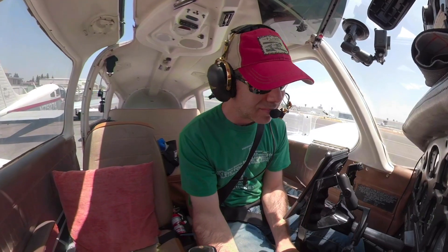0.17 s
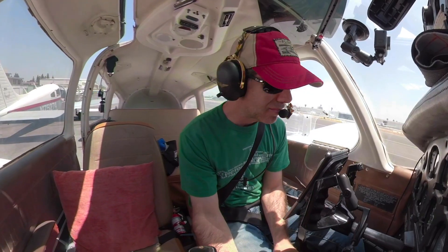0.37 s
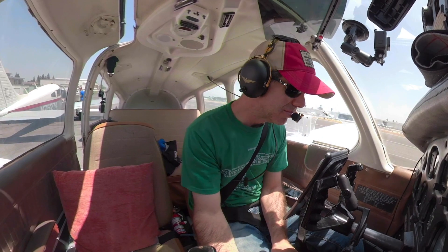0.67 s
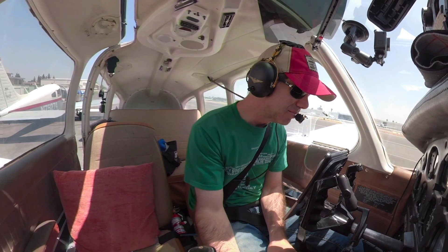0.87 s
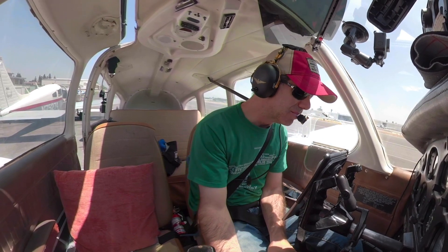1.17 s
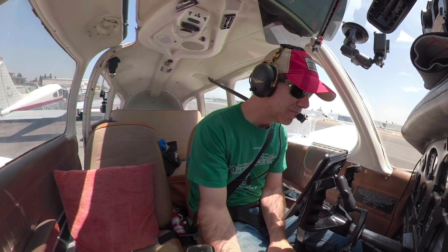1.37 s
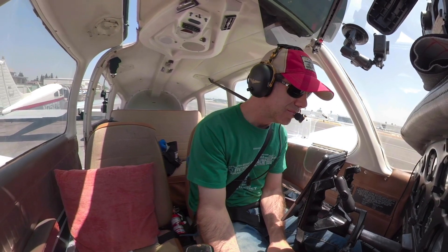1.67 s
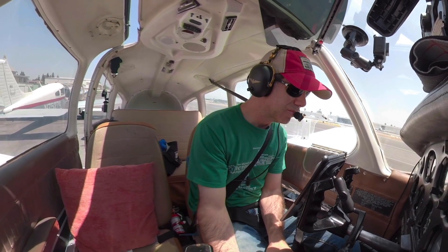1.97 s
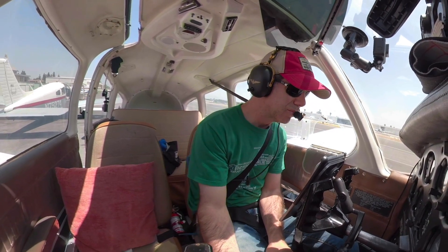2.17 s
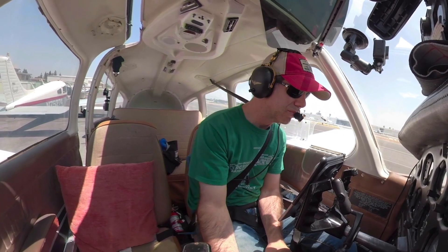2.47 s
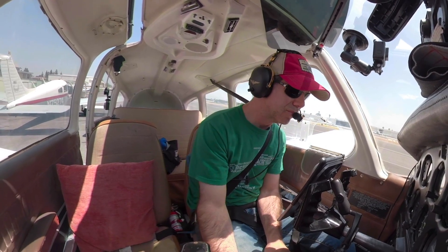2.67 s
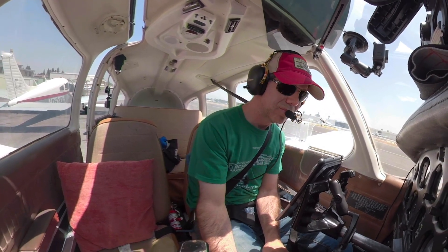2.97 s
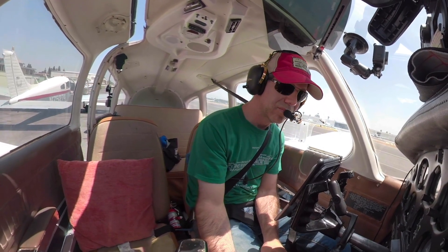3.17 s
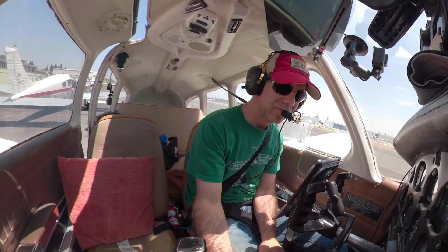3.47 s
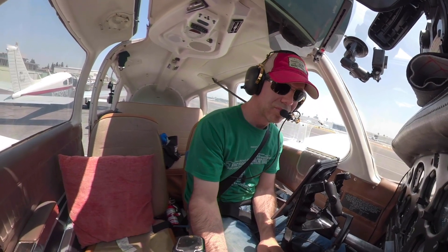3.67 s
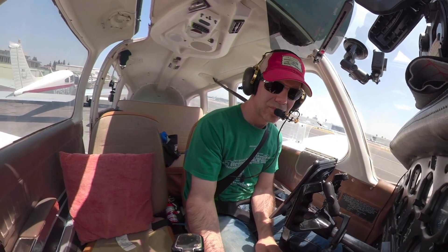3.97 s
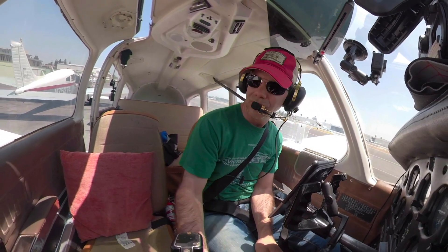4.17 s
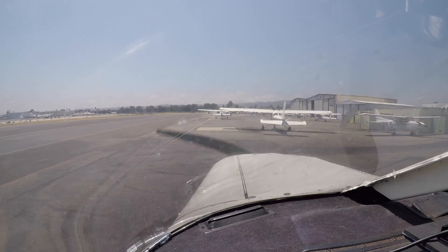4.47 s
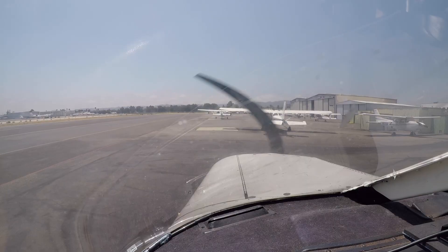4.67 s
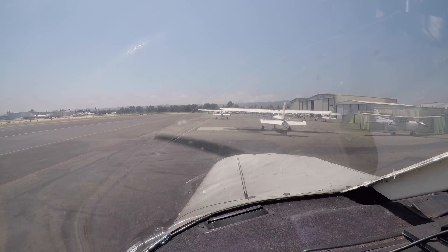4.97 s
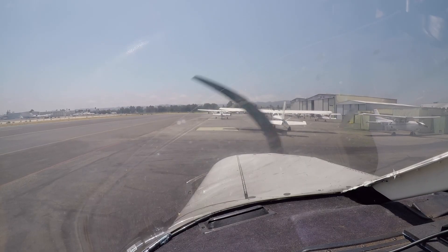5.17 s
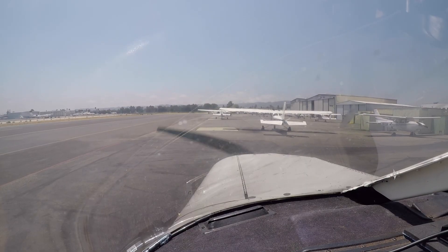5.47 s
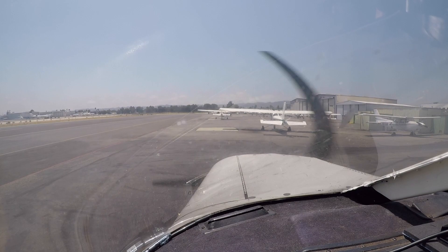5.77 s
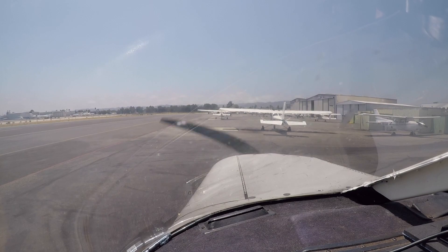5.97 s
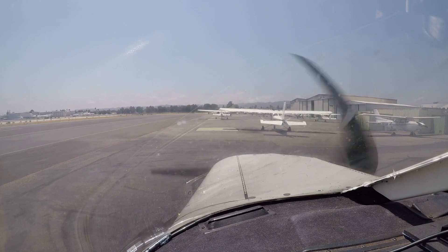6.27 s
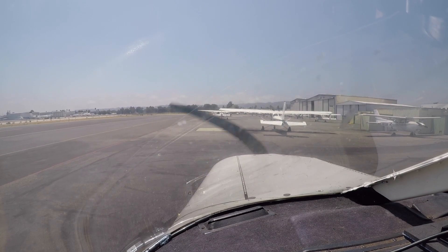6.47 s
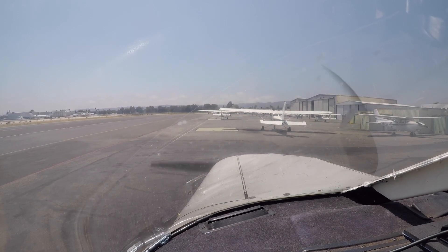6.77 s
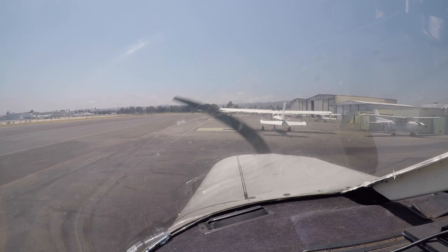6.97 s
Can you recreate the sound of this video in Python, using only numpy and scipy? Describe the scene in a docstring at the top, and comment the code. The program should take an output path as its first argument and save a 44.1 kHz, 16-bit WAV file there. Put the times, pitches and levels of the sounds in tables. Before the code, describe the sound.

Already running at the start, a small four-cylinder aircraft engine idles in a boxy cabin, heard at close range. Deep, uneven exhaust and propeller beats pulse about 45 times a second, with rumble, ringing metal panels, buzzing trim, breathy propeller wash and thin hiss above. Knocking roughens it from 0.2 to 1.8 seconds, with a faint tick near 1.2. The engine sags slightly between 1.2 and 3 seconds, while another lopsided knock persists from 1.7 to 4.3. Tiny silent gaps interrupt it at 3.2 and 4.25. From 4.5 to 5.2 the propeller roar builds, brighter and harsher, with stronger knocking. At about 5.7 the whole sound suddenly becomes louder and bassier, its peaks clipping, and the pace picks up slightly. Wash begins easing after 6.4, but the heavy drone continues until an abrupt stop at 7.1 seconds.

```python
"""Light aircraft cabin, piston engine near idle

A four-cylinder engine runs near 1350 rpm, lopes and sags to about 1250, then picks up a little, with spells of knocking.
Exhaust and propeller beats are unsteady tones that boom in the cabin; every firing rattles the cowling's modes.
Pulsing coloured noise makes the exhaust rumble, the propeller wash and the air rushing over the windscreen.
Late on the propeller's roar builds, then the whole sound steps up and its peaks clip; twice it drops out for an instant."""
import sys
import numpy as np
from scipy.fft import rfft, irfft, next_fast_len
from scipy.io import wavfile
from scipy.ndimage import map_coordinates

SR = 44100
rng = np.random.default_rng(int(sys.argv[2]) if len(sys.argv) > 2 else 0)


def to_wav(s):
    """Save 16-bit WAV."""
    ch = np.atleast_2d(s).T  # columns
    pcm = np.round(np.clip(ch, -1, 1) * 32767)  # PCM
    wavfile.write(sys.argv[1], SR, pcm.astype(np.int16))


N = 313551

# Engine speed: time_s, firings_per_s
ENGINE_SPEED = [(0.0, 45.07), (0.25, 46.16), (1.2, 46.27), (1.85, 43.22), (3.0, 41.88), (4.0, 41.67),
                (4.3, 42.31), (4.6, 41.76), (5.55, 42.01), (5.8, 42.83), (7.11, 42.93)]
IDLE_RATE = 42  # firings per second at idle, two per revolution
# How far the blades pass ahead of the exhaust pulse: time_s, lead_beats
BLADE_LEAD = [(1.3, 0), (2, .25)]
# Weaker lines from unequal cylinders: multiple of the four-stroke cycle rate, relative_db
UNEVEN_LINES = [(3, -13.5), (5, -23), (6, -13.5), (7, -19), (9, -24.5), (10, -21.5), (11, -20.5),
                (13, -22.5), (14, -21.5), (15, -23), (16, -28.5), (17, -33), (18, -27), (19, -27)]
# Spells of one cylinder knocking harder: start_s, end_s, place_firings (in a cycle of four), over_cowling_db
KNOCK_SPELLS = [(.2, 1.8, 1.4, 3), (.55, 1.75, 0.23, 6.5), (1.7, 4.3, 2.15, 9.5), (4.35, 6.4, 3, 8.5),
                (5.15, 6.7, 1.65, 12), (5.6, 6.85, 2, 7.5)]
KNOCK_WIDTH, KNOCK_FADE_S = 0.4, 0.12  # a knock's spread in firings; a spell's fade in and out
PANEL_HZ, PANEL_RISE = 818.4, 5.2  # cowling's loudest mode at idle; Hz more per extra firing per second

# Ringing modes of the cowling (its higher ones), firewall and loose cabin trim: pitch_hz, width_hz, relative_db
COWLING_MODES = [(908, 51, -0.5), (1083, 43, -5), (1596, 35, -10.5)]
FIREWALL_MODES = [(375.6, 33, -2), (451, 50, -3.5), (512, 31, -4), (601.4, 71, 2.5), (671, 56, -0.5)]
TRIM_MODES = [(1283, 43, -1.5), (1386, 56, -2.5), (1601, 41, -1.5), (1880, 52, -4), (2520, 230, -11),
              (2910, 63, -7)]

# Noise colours, from airframe shudder up to thin sizzle, then the ticks: frequency_hz, relative_db (per Hz)
BUFFET_COLOUR = [(5, -19.5), (15, -9), (30, 5.5), (50, -3.5), (70, -5.5), (110, -18.5), (200, -39.5)]
RUMBLE_COLOUR = [(60, -12), (110, 0.5), (170, 1), (230, -6), (310, -10.5), (450, -13), (700, -27.5),
                 (1500, -53)]
WASH_COLOUR = [(200, -20.5), (350, 0.5), (480, 3), (750, 6), (1050, 1.5), (1300, -6), (2100, -11.5),
               (2900, -15), (3500, -19), (4100, -26), (5000, -34), (9000, -57)]
EDGE_COLOUR = [(1200, -10.5), (2200, 4), (3400, -4), (4300, 3), (5500, 0), (8000, -17), (10500, -17),
               (15000, -29)]
HISS_COLOUR = [(2000, -19.5), (4300, -17), (5000, -1), (5450, 3.5), (6200, -1.5), (7300, -2.5), (8300, -15),
               (9500, -25.5), (11000, -18), (15000, -36)]
SIZZLE_COLOUR = [(8000, -35), (10500, -12.5), (11300, -5.5), (12000, 4.5), (13000, -1.5), (14500, -3),
                 (15100, -5.5), (15800, -25)]
TICK_COLOUR = [(1000, -1), (3000, 0), (8000, -8), (15000, -16.5)]

# Faint ticks: centre_s, level_db (at the centre), half_length_s
TICKS = [(1.181, -27.5, .0006), (5.233, -46, .003), (5.686, -31, .0004), (6.16, -44, .005)]
# Moments of silence: start_s, end_s
DROPOUTS = [(3.1829, 3.192), (4.2379, 4.26)]
TOP_HZ = 15760  # nothing sounds above this

# The propeller's roar builds, holds and begins to ease
SURGE_S, SURGE_RISE_S, SURGE_HOLD_S, SURGE_FALL_S = 4.53, 0.67, 1.22, 1.5
SWELL_S, SWELL_RISE_S = 5.66, 0.026  # the whole sound steps up and stays there

# Layer levels: idle_db, speed_db (per extra firing per second), surge_db (added), swell_db (added)
# Engine rocking, propeller beat, then harmonics of the firings
ROCKING_LEVEL = (-20.5, 0.3, .5, 5)
BEAT_LEVEL = (-20.5, 1.4, 4.5, 2.5)
SECOND_LEVEL = (-15.5, -1.58, 1.05, 2.5)
THIRD_LEVEL = (-21.5, -0.34, -0.4, 7)
FIFTH_LEVEL = (-43.5, 2.04, 1, 4.5)
SIXTH_LEVEL = (-45.5, -0.4, 8.5, 3)
# Lines from unequal cylinders, airframe shudder, cowling between knocks
UNEVEN_LEVEL = (-17.5, 0.27, 2, 4.5)
BUFFET_LEVEL = (-22, 0.37, 0.5, 4)
COWLING_LEVEL = (-44, 0.42, 2, 0.5)
# Exhaust rumble, firewall clatter, loose trim
RUMBLE_LEVEL = (-28.5, 0.73, 2, 4.5)
CLATTER_LEVEL = (-40.3, 0.13, 4.5, -0.2)
TRIM_LEVEL = (-47, -0.07, -0.1, 2)
# Propeller wash, its bright edge, air hiss, thin sizzle
WASH_LEVEL = (-38, 0.67, 6, 2)
EDGE_LEVEL = (-62, 0.36, 9.5, 2.5)
HISS_LEVEL = (-54.5, 0.59, -.4, 5.5)
SIZZLE_LEVEL = (-60.5, -.6, -4, 6)


def boom(firings):
    """Low pressure beats of exhaust and propeller; no two cycles burn quite alike."""
    # two blades, so one propeller beat for each firing
    blades = loudness(BEAT_LEVEL) * line(firings + curves(BLADE_LEAD)[0], 0.26)
    exhaust = loudness(SECOND_LEVEL) * line(2 * firings, 0.07)
    exhaust += loudness(THIRD_LEVEL) * line(3 * firings, 0.22)
    drone = loudness(FIFTH_LEVEL) * line(5 * firings, 0.49)
    drone += loudness(SIXTH_LEVEL) * line(6 * firings, 0.5)
    # once a revolution: every other firing hits harder
    rocking = loudness(ROCKING_LEVEL) * line((firings + 1) / 2, 0.65)
    return blades + exhaust + drone + rocking + uneven_cylinders(firings)


def uneven_cylinders(firings):
    """Unequal cylinders add weaker lines at multiples of the four-firing cycle."""
    cycles = firings / 4
    lines = sum(amp(db) * line(round(multiple) * cycles + rng.random(), 0.54)
                for multiple, db in UNEVEN_LINES)
    return loudness(UNEVEN_LEVEL) * lines


def cowling(firings):
    """Every firing shakes the cowling: one mode sings, the higher ones and the firewall chatter."""
    force = loudness(COWLING_LEVEL) * knocking(firings)
    force *= throb(firings, lag=0.38, depth_db=3.0) * amp(1.3 * wobble(25))
    phase = 2 * np.pi * np.cumsum(PANEL_HZ + PANEL_RISE * overspeed()) / SR
    singing = np.sqrt(2) * np.cos(phase + 1.65 * wobble(45))
    chatter = rattle(amp(-8) * force, COWLING_MODES) + rattle(amp(-7) * force, FIREWALL_MODES)
    return amp(1.2) * force * singing + chatter


def knocking(firings):
    """Strength of the blows: even, but for spells in which one cylinder hits harder once a cycle."""
    power = np.ones(N)
    for start, end, place, db in KNOCK_SPELLS:
        fade_in = ramp(start - KNOCK_FADE_S / 2, KNOCK_FADE_S)
        fade_out = ramp(end - KNOCK_FADE_S / 2, KNOCK_FADE_S)
        away = (firings - place + 2) % 4 - 2  # distance from the knock, in firings
        blow = np.exp(-(away / KNOCK_WIDTH) ** 2 / 2)
        power += (fade_in - fade_out) * amp(db) ** 2 * blow
    return np.sqrt(power)


def exhaust_rumble(firings):
    """Low exhaust noise that pulses slightly with each firing."""
    return loudness(RUMBLE_LEVEL) * noise(RUMBLE_COLOUR) * throb(firings, lag=0.054, depth_db=0.5)


def firewall_clatter(firings):
    """The firewall chatters in its modes, harder once a revolution and once a four-firing cycle."""
    force = loudness(CLATTER_LEVEL) * throb(firings / 2, lag=0.014, depth_db=3.5)
    force *= throb(firings / 4, lag=0.5, depth_db=1.5)
    return rattle(force, FIREWALL_MODES)


def cabin_trim(firings):
    """Loose trim buzzes in its modes with every firing."""
    force = loudness(TRIM_LEVEL) * throb(firings, lag=0.11, depth_db=5.0) * amp(0.66 * wobble(45))
    return rattle(force, TRIM_MODES)


def propeller_wash(turns):
    """Broad propeller noise that pulses once a turn, with a steadier bright edge."""
    wash = loudness(WASH_LEVEL) * noise(WASH_COLOUR)
    wash *= throb(turns, lag=0.06, depth_db=0.76) * amp(1.0 * wobble(90))
    return wash + loudness(EDGE_LEVEL) * noise(EDGE_COLOUR)


def windscreen_air(turns):
    """Air hiss and a flickering thin sizzle, both pulsing with the turning propeller."""
    hiss = loudness(HISS_LEVEL) * noise(HISS_COLOUR) * throb(turns, lag=0.15, depth_db=0.5)
    sizzle = loudness(SIZZLE_LEVEL) * noise(SIZZLE_COLOUR)
    sizzle *= throb(turns, lag=0.25, depth_db=2.0) * amp(1.2 * wobble(60))
    return hiss + sizzle


def airframe_buffet():
    """The airframe shudders along as low noise."""
    return loudness(BUFFET_LEVEL) * noise(BUFFET_COLOUR)


def ticks():
    """Short dry ticks: noise under bell-shaped envelopes."""
    t = np.arange(N) / SR
    envelope = sum(amp(db) * np.exp(-((t - centre) / length) ** 2) for centre, db, length in TICKS)
    return envelope * noise(TICK_COLOUR)


def overspeed():
    """Firings per second above idle."""
    return curves(ENGINE_SPEED)[0] - IDLE_RATE


def loudness(level):
    """A layer's gain: it follows the engine speed, the surge and the swell."""
    idle_db, speed_db, surge_db, swell_db = level
    surge = ramp(SURGE_S, SURGE_RISE_S)
    surge -= ramp(SURGE_S + SURGE_RISE_S + SURGE_HOLD_S, SURGE_FALL_S)
    swell = ramp(SWELL_S, SWELL_RISE_S)
    return amp(idle_db + speed_db * overspeed() + surge_db * surge + swell_db * swell)


def line(turns, unsteady):
    """A tone, one cycle per turn, whose strength and phase wander; rms near 1."""
    wander = 1 + unsteady * (wobble(11) + 1j * wobble(11))
    tone = np.real(np.exp(2j * np.pi * turns) * wander)
    return np.sqrt(2) * tone / np.sqrt(1 + 2 * unsteady ** 2)


def rattle(force, modes):
    """A loose panel chatters under a force and rings in its modes; it keeps the rms of the force."""
    def panel(hz):
        response = 0
        for k, (centre, width, db) in enumerate(modes):
            damping = 1j * hz * width
            # neighbouring modes ring in opposite phase
            response = response + (-1) ** k * amp(db) * damping / (centre ** 2 - hz ** 2 + damping)
        return response / (1 + (hz / 2500) ** 4)  # dulled well above the modes

    ring = filtered(force * rng.standard_normal(N), panel)
    return unit(ring) * np.sqrt(np.mean(force ** 2))


def throb(turns, lag, depth_db):
    """A gain of rms 1 that peaks once a turn, lag turns after its start."""
    return unit(amp(depth_db * np.cos(2 * np.pi * (turns - lag))))


def noise(colour):
    """Noise of rms 1, coloured by points on a log frequency axis."""
    point_hz, db = np.transpose(colour)

    def response(hz):
        return amp(np.interp(np.log(hz + 1), np.log(point_hz), db, right=-120))

    return unit(filtered(rng.standard_normal(N), response))


def filtered(x, response):
    """x shaped by a complex response of frequency."""
    size = next_fast_len(N + SR // 2)
    return irfft(rfft(x, size) * response(np.fft.rfftfreq(size, 1 / SR)), size)[:N]


def wobble(rate):
    """A smooth random curve, rate knots a second."""
    knots = rng.standard_normal(int(N * rate / SR) + 4)
    return map_coordinates(knots, [np.arange(N) * rate / SR])


def curves(rows):
    """One value per sample for each column after the time."""
    s, *columns = np.transpose(rows)
    return np.array([np.interp(np.arange(N) / SR, s, column) for column in columns])


def ramp(start, length):
    """Rises from 0 to 1 over length seconds."""
    return np.clip((np.arange(N) / SR - start) / length, 0, 1)


def amp(db):
    """Decibels to gain."""
    return 10 ** (np.asarray(db) / 20)


def unit(x):
    """Scale to rms 1."""
    return x / np.sqrt(np.mean(x ** 2) + 1e-20)


def scene():
    """The count of firings drives the engine and propeller layers; shudder and ticks join them."""
    firings = np.cumsum(curves(ENGINE_SPEED)[0]) / SR
    turns = firings / 2  # propeller revolutions
    engine = boom(firings) + cowling(firings) + exhaust_rumble(firings)
    rattles = firewall_clatter(firings) + cabin_trim(firings)
    air = propeller_wash(turns) + windscreen_air(turns)
    return (engine + rattles + air + airframe_buffet() + ticks())[None]


def record(dry):
    """The loudest beats clip, the sound drops out briefly, and nothing passes above the band limit."""
    t = np.arange(N) / SR
    clipped = dry[0] / (1 + np.abs(dry[0]) ** 24) ** (1 / 24)  # nearly hard clipping at 1
    live = ~np.any([(t > start) & (t < end) for start, end in DROPOUTS], axis=0)
    soft_ends = np.clip(np.minimum(t, t[-1] - t) / 0.003, 0, 1)
    return filtered(clipped * live * soft_ends, lambda hz: hz < TOP_HZ)[None]


dry = scene()
out = record(dry)
to_wav(out)
```